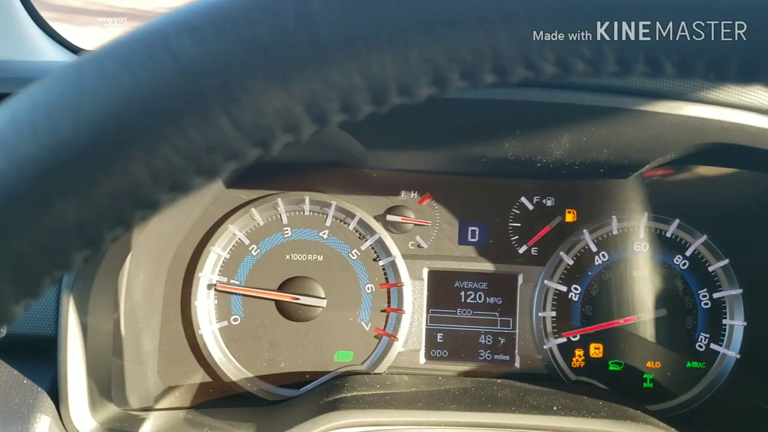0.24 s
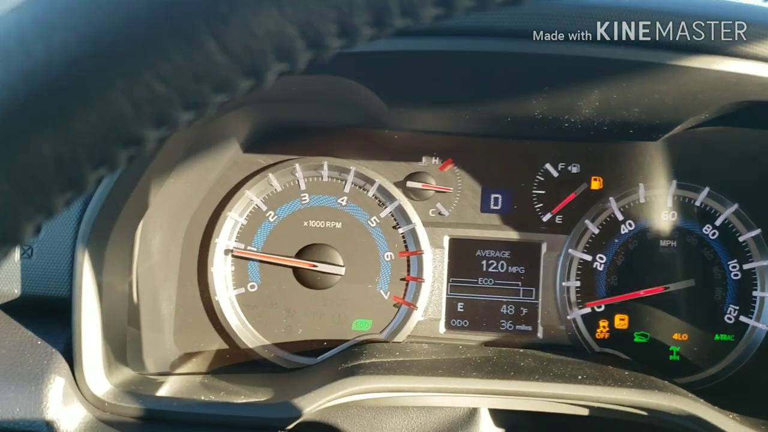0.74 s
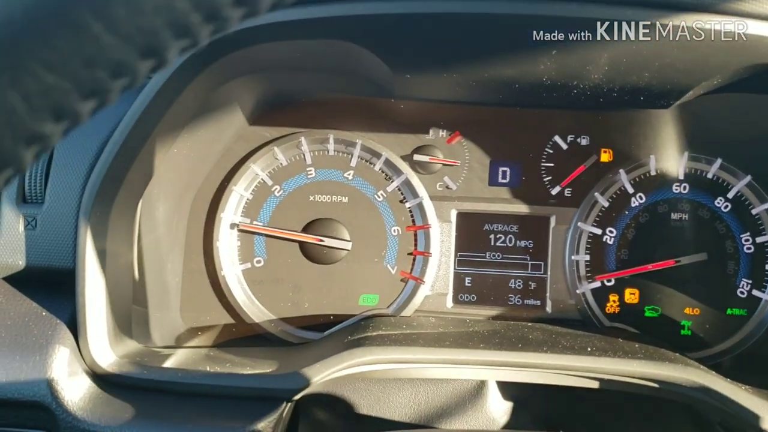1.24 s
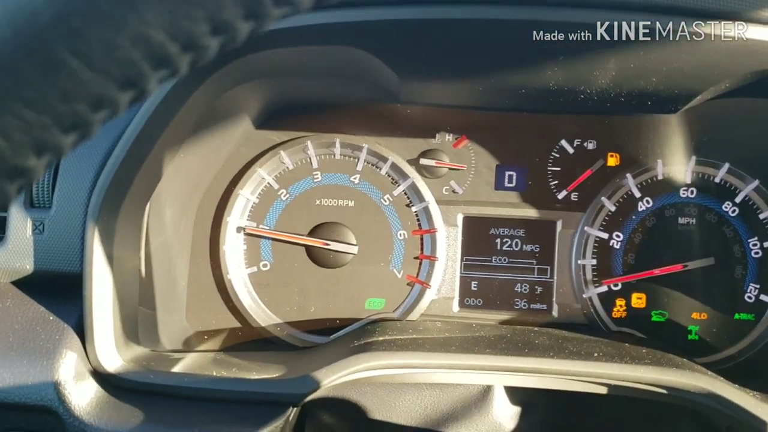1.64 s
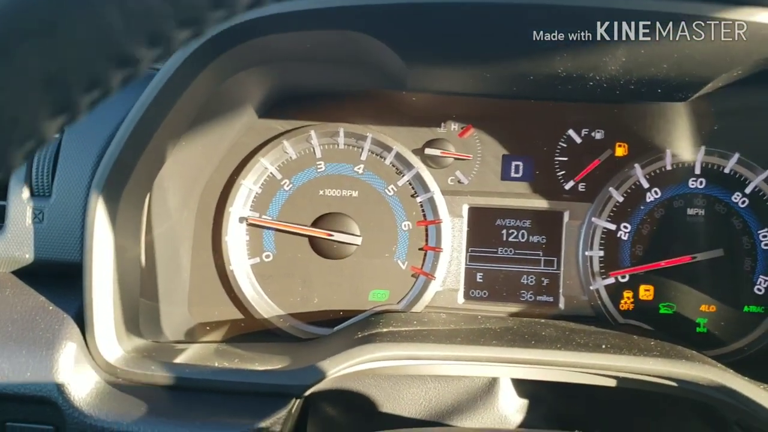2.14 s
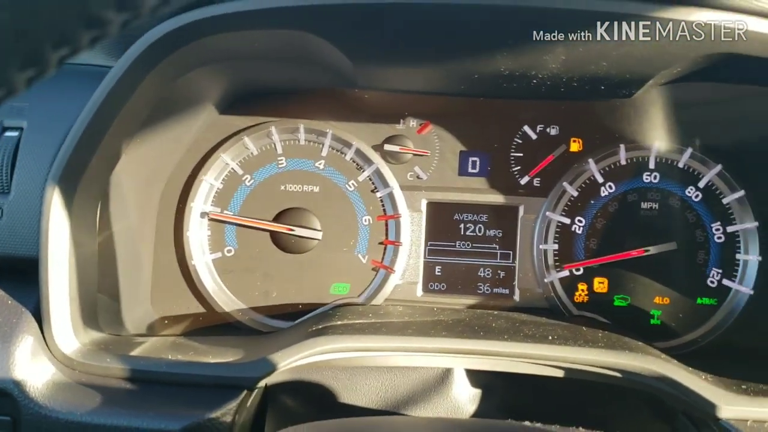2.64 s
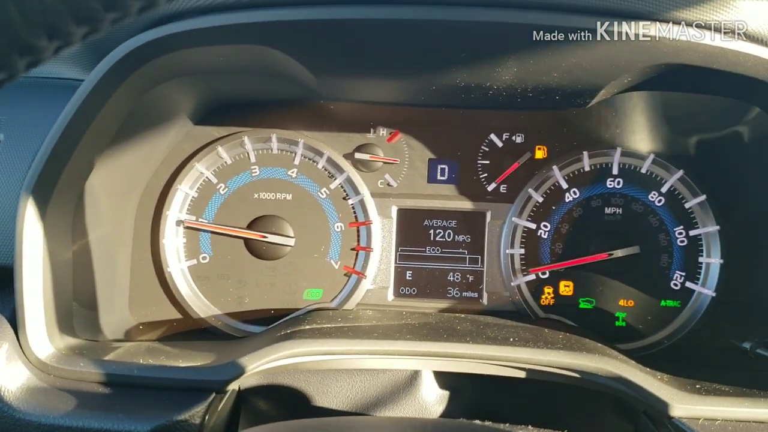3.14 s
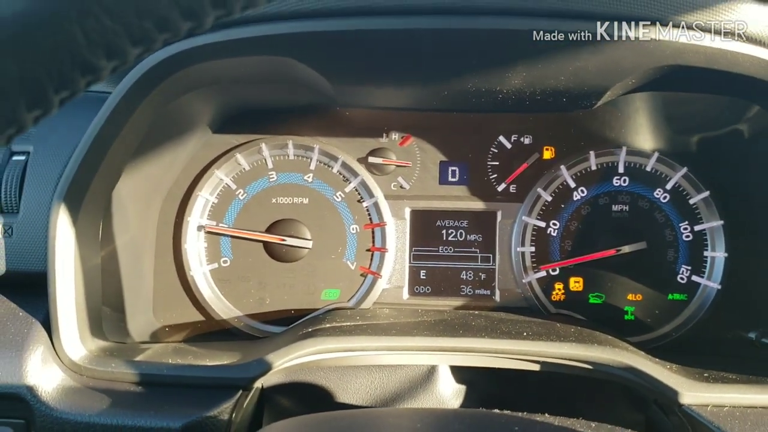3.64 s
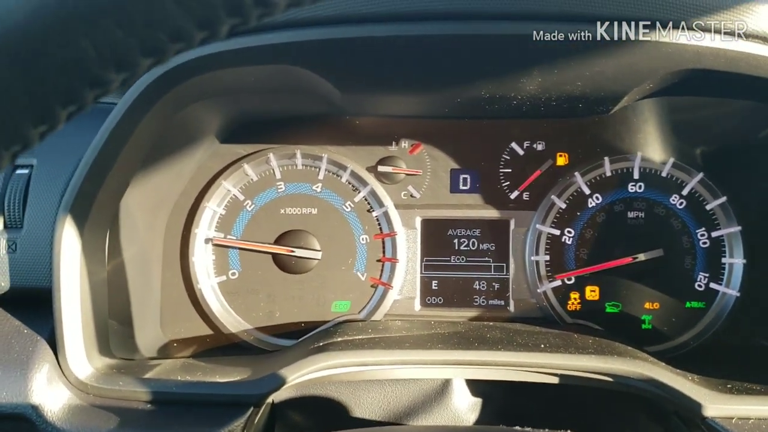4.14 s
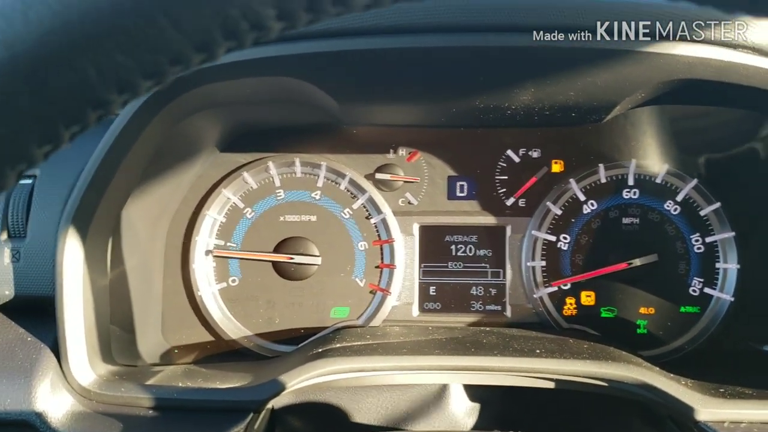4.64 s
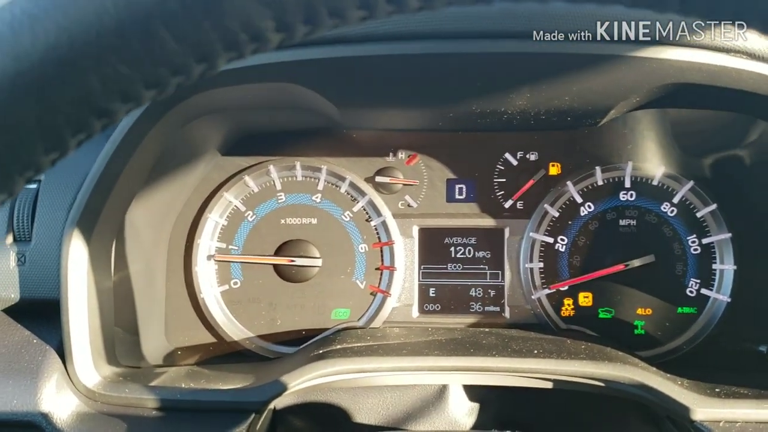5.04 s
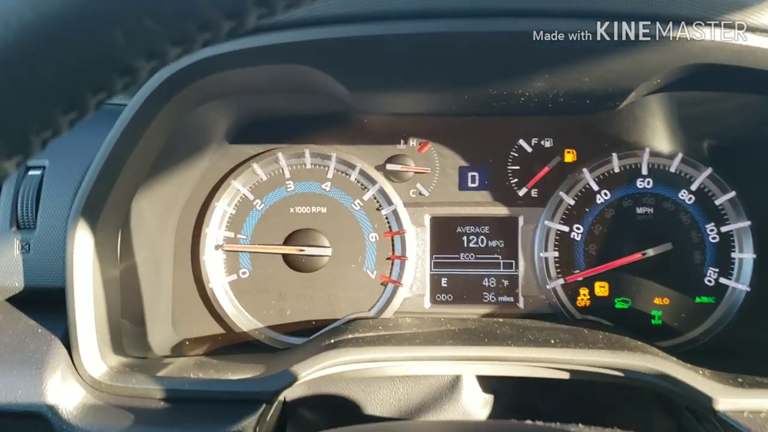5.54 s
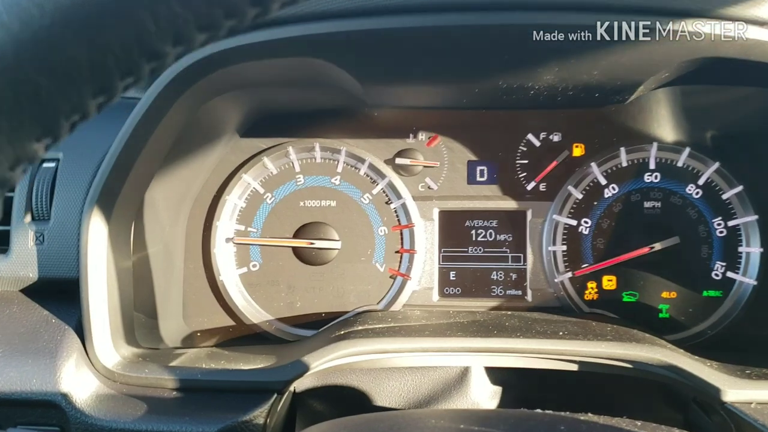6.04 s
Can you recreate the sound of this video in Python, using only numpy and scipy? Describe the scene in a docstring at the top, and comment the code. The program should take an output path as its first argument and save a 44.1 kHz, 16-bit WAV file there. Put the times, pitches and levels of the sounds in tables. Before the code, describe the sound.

Brake valves knock and clunk in irregular groups, heard from the cabin of a slowly moving vehicle and slightly to the left. Two quick metallic clunks open, then come scattered dull thuds, three firm hollow knocks and, after a pause, a heavy stuttering run of clunks that shakes the body. A low idling engine and tyre rumble continue underneath, the pitch dropping a little, with faint trim ticks and fluid hiss.

```python
"""An anti-lock brake unit works the brakes, heard inside an off-road vehicle that crawls at idle.
Its valves knock through the bulkhead (the wall behind the engine) and send pressure surges down the lines.
The brakes grab with metal clunks that thud through the body, and fluid hisses and sings in the valves.
Behind them, plastic trim ticks, the tyres rumble and a six-cylinder engine hums low."""
import sys
import numpy as np
from scipy import signal
from scipy.fft import rfft, irfft, next_fast_len
from scipy.io import wavfile

SR = 44100
rng = np.random.default_rng(int(sys.argv[2]) if len(sys.argv) > 2 else 0)


def master(y):
    """Save y as 16-bit WAV."""
    cut = np.clip(np.atleast_2d(y).T, -1, 1)
    pcm = np.round(cut * 32767)  # scale
    wavfile.write(sys.argv[1], SR, pcm.astype(np.int16))


N = 277389
TIME = np.arange(N) / SR
FFT_SIZE = next_fast_len(N + SR // 2, real=True)
FREQ = np.maximum(np.arange(FFT_SIZE // 2 + 1) * SR / FFT_SIZE, 1)

# how the engine idles: (time [s], firing rate [Hz], boost of harmonics 3 and up [dB])
IDLE = [(0, 45.1, 6.5), (.8, 45.44, 1), (1.5, 45.96, 2.5), (2.8, 45.51, 1.5), (3.799, 46.21, 2.5),
        (4.149, 44.22, -0.5), (4.449, 39.55, 1), (4.801, 37.38, -11), (5.3, 36.46, 0.5), (6.29, 36.7, -22)]
# the tones in its hum: (multiple of the firing rate, level [dB])
HARMONICS = [(1, -47.5), (2, -50.5), (3, -57), (4, -61), (5, -61), (6, -58), (7, -60.5), (8, -58), (9, -69),
             (10, -70.5), (12, -69), (13, -71)]
# the tone of its roar in the cabin: (frequency [Hz], relative level [dB])
ROAR_TONE = [(12, -26), (21, -4.5), (27, 9.5), (34, 3.5), (60, -17), (110, -12), (160, -7.5), (200, -29.5),
             (330, -15), (410, -19), (500, -24.5), (700, -27), (1000, -34), (2200, -52.5), (4600, -58.5),
             (8000, -57.5), (15500, -52.5)]
# how much the ears differ, against what they share: (frequency [Hz], level [dB])
STEREO_WIDTH = [(30, -18), (70, -40), (150, -11.5), (350, -3), (600, -8.5), (1100, 2.5), (2500, 0.5),
                (15000, -0.5)]
# how much louder the left ear hears the brakes: (frequency [Hz], left minus right [dB])
LEFT_BOOST = [(60, 1.5), (200, 3), (380, 3), (650, 1), (1200, 5), (2300, 12.5), (4400, 8.5), (7500, 8),
              (10000, 3), (14000, -4)]
# the clearest ticks of the trim: (time [s], level [dB], middle of the noise band [Hz])
TICKS = [(0.219, -55, 2800), (0.282, -62, 6400), (.299, -54.5, 4030), (0.339, -52, 2970),
         (0.393, -50, 3400), (.438, -55.5, 4390), (0.546, -48, 5500), (0.599, -53, 3800),
         (5.478, -54.5, 7500), (6.279, -58, 5100)]
# fluid gushes: (time [s], level [dB], opening [s], held open [s], jet relative to the gush [dB])
GUSHES = [(.12, -66, .18, .13, -18), (.55, -67.5, 0.017, 0.027, -12), (1.56, -62.5, 0.21, 0.23, -30),
          (2.48, -61.5, 0.048, 0.08, -8.5), (3.17, -71, 0.059, 0.019, -2), (5.34, -74, 0.077, 0.46, -20),
          (6.06, -67.5, 0.25, .1, -9)]
# spurts as the pressure is let off: (time [s], level [dB])
SPURTS = [(3.187, -61), (3.245, -59), (3.295, -67)]
# the whistle drifts slowly up and down, by each pitch's distance from their mean: (time [s], pitch [Hz])
WHISTLE_GLIDES = [
    [(0.7, 6600), (1.5, 6665)],
    [(2.74, 6530), (3.14, 6580)],
]
# a brake grabs or lets go and jolts the body: (time [s], level [dB], push length [s], cabin boom [dB])
JOLTS = [(3.544, -14, 0.017, -60), (5.294, -12, 0.025, -38), (5.323, -6.5, 0.0117, -27.5),
         (5.353, -5.5, 0.014, -44), (5.638, -13, 0.0068, -52), (5.728, -10, 0.0075, -34.5),
         (5.749, -5, 0.011, -57)]
# the brakes grab: (time [s], bulkhead [dB], bracket [dB], steel lines [dB], time to fade 60 dB [s])
CLUNKS = [(0.066, -28, -32.5, -35, 0.093), (0.111, -39, -45, -68, 0.11), (3.371, -27.5, -29.5, -38.5, 0.12),
          (5.267, -26, -34.5, -36.5, 0.1), (5.350, -24.5, -28, -37.5, 0.11), (5.58, -25, -31, -32.5, 0.087),
          (5.686, -25.5, -40.5, -42, 0.11), (5.749, -25.5, -25.5, -35.5, 0.083)]
# valve strokes: (time [s], knock [dB], surge [dB], thud pitch [Hz], opening scrape [dB], closing clack [dB])
STROKES = [(0.077, -25.5, -28, 205.5, -51, -48), (0.114, -26.5, -26, 196.5, -64, -55),
           (1.573, -32.5, -20.5, 160.4, -53, -47.5), (1.673, -36, -20, 152.6, -51.5, -45.5),
           (1.873, -38, -21, 177.3, -52, -44.5), (2.274, -32, -19.5, 170, -54.5, -55),
           (3.174, -18.5, -18, 128.5, -50.5, -70), (3.273, -17.5, -18, 123, -53.5, -80),
           (3.374, -18, -22, 138, -50.5, -61), (5.285, -20, -15, 149.2, -57, -63),
           (5.355, -18, -27, 164.3, -61, -60), (5.584, -51, -17, 129.2, -53.5, -61),
           (5.695, -24.5, -19.5, 155.7, -50.5, -51.5), (5.752, -19, -26, 136.5, -75, -69)]
# the pressure wave slaps the line after a stroke: (delay [s], level relative to the surge [dB])
SURGE_SLAPS = [(0.013, -4.5), (.025, -5), (0.044, 0.5), (0.057, -11.5), (0.076, -1.5)]

# the pitches each part favours, its resonances: (pitch [Hz], width [Hz], relative level [dB])
BODY_MODES = [(36.2, 7.6, 5.5), (58.4, 90, 6), (62.4, 3.9, -7), (78, 6.3, -9), (99, 34, 6),
              (142.5, 21, -2.5), (164, 78, -6), (196.3, 15, 2), (229, 49, -15.5)]
CABIN_MODES = [(153, 37, -5.5), (320.5, 11, -9.5), (357.1, 21, -2.5), (593.3, 52, -16), (1132, 32, -26.5),
               (1507, 53, -34.5), (1694, 114, -36)]
TRIM_MODES = [(1600, 1400, -2), (3240, 830, 1.5), (4830, 2000, -3.5), (6700, 730, -2.5),
              (11000, 21000, -16.5)]
OPENING_MODES = [(1670, 530, 12.5), (2370, 490, 5.5), (3240, 2400, 12), (5220, 1830, 4.5), (6200, 620, 11),
                 (11100, 11500, -1.5)]  # fluid rushing through a valve
JET_MODES = [(3400, 900, -46), (5970, 1600, 16), (6740, 880, 19.5), (8250, 2400, 10), (9900, 910, -3.5)]
WHISTLE_MODES = [(6260, 185, -8.5), (6560, 480, -5), (6860, 970, -7)]
SINGING_MODES = [(2760, 125, -6), (4190, 190, -5), (4590, 130, -9), (5640, 200, -5)]  # the thin singing of fluid trickling after the last clunk
BULKHEAD_MODES = [(179.8, 62, 0), (286, 62, -6.5), (374.7, 46, -1.5), (427, 10.7, -5.5), (521, 79, -11),
                  (574.8, 22, -4.5), (657, 100, -12), (800, 81, -28), (904, 45, -16.5), (1192, 210, -25)]
BRACKET_MODES = [(942, 460, 12), (1607, 144, 9.5), (1876, 230, 5), (2270, 1140, 0.5), (2946, 790, 3.5),
                 (3375, 145, 2), (3830, 350, -0.5), (4390, 380, -6.5)]
STEEL_MODES = [(3000, 1500, -7), (5600, 600, -3), (6280, 520, 1), (6850, 600, -2), (7400, 550, 0),
               (9000, 900, -3), (9900, 900, -2), (11400, 1600, -5), (13000, 1800, -6), (15000, 1800, -8)]
MOUNT_MODES = [(343, 44, 5), (366.4, 10.6, 5.5), (558, 85, -12), (594, 77, -20.5), (980, 150, -38)]  # the brake unit's mount

# tones that ring on after a blow: (pitch [Hz], level relative to the blow [dB], time to fade 60 dB [s])
BULKHEAD_RINGS = [(288, -14.5, 0.36), (412, -10, 0.31), (791, -15, 0.12)]
BRACKET_RINGS = [(1245, -22, 0.15), (1553, -17, 0.13), (1742, -18.5, 0.092), (2333, -17, 0.092),
                 (2918, -15, 0.07), (3430, -17, 0.079)]
STEEL_RINGS = [(5780, -14, .055), (6220, -7.5, 0.076), (7420, -14, .06)]
SEAT_RINGS = [(543, 5, 0.16), (936, -3.5, 0.09), (1306, -10, 0.17), (2600, -8.5, 0.11), (3200, -3.5, 0.05),
              (3603, 1, 0.074), (5100, -12.5, 0.074), (6090, -13, 0.055), (7260, -9.5, 0.081)]  # the clack of a plunger landing on its seat
PANEL_RINGS = [(59.67, -18.5, 1.97)]
FLOOR_RINGS = [(57.3, -13.5, 0.31)]
CABIN_RINGS = [(194.6, 0.0055, 1.47)]

# added to a plunger's scrape or clack in each part: (bulkhead [dB], bracket [dB], steel lines [dB])
SCRAPE_SPREAD = (20.5, 0.5, -8)
CLACK_SPREAD = (7.5, -2, -15.5)

CLACK_DELAY_S, THUD_DELAY_S = 0.017, 0.026  # counted from the start of a stroke
CHATTER_RISE_S = 0.005


def gain(db):
    """Turn decibels into a number to multiply by."""
    return 10 ** (np.asarray(db) / 20)


def decay(t, t60):
    """Stay at 1 until t is zero, then fade by 60 dB every t60 seconds."""
    return np.exp(-np.log(1000) * np.maximum(t, 0) / t60)


def swell(start, rise_s, hold_s, t60):
    """A loudness curve that opens, holds and dies away."""
    t = TIME - start
    return np.clip(t / rise_s, 0, 1) ** 2 * decay(t - rise_s - hold_s, t60)


def burst(rise_s, t60, tail_db, tail_t60):
    """The loudness curve of a hit: it builds, dies away and leaves a softer tail in the cabin."""
    t = TIME[:int(SR * min(max(t60, tail_t60), 1.5))]
    tail = gain(tail_db) * decay(t - rise_s, tail_t60)
    return np.minimum(t / rise_s, 1) ** 2 * (decay(t - rise_s, t60) + tail)


def push(length_s):
    """A smooth push that adds up to 1: the longer, the duller."""
    force = np.sin(np.pi * np.minimum(TIME[:SR // 10] / length_s, 1)) ** 2
    return force / force.sum()


def wander(step_samples=SR // 10):
    """A random curve that heads for a new value at every step."""
    knots = TIME[::step_samples]
    return np.interp(TIME, knots, rng.standard_normal(len(knots)))


def tone_curve(points):
    """A gain for every frequency, drawn through (Hz, dB) points."""
    hz, db = np.transpose(points)
    return gain(np.interp(np.log(FREQ), np.log(hz), db))


def resonances(modes):
    """A filter that favours a part's own pitches and keeps white noise equally strong."""
    power = sum((gain(db) / (1 + ((FREQ - hz * hz / FREQ) / width) ** 2)) ** 2 for hz, width, db in modes)
    # keeping half the cepstrum makes the part ring after a hit, never before it
    cepstrum = irfft(np.log(power / power.mean() + 1e-9))
    return np.exp(rfft(np.r_[cepstrum[0] / 2, cepstrum[1:FFT_SIZE // 2]], FFT_SIZE))


def filtered(sound, response):
    """Turn each frequency of a sound up or down."""
    return irfft(rfft(sound, FFT_SIZE) * response, FFT_SIZE)[..., :N]


def stereo_noise():
    """Noise whose bass is alike in both ears and whose treble is not."""
    width = tone_curve(STEREO_WIDTH)
    shares = np.array([np.ones_like(width), width]) / np.sqrt(1 + width ** 2)
    mid, side = filtered(rng.standard_normal((2, N)), shares)
    return np.array([mid + side, mid - side])


def add(track, start, sound):
    """Mix a sound into a track at a start time in seconds."""
    first = max(int(start * SR), 0)
    part = sound[:max(N - first, 0)]
    track[first:first + len(part)] += part


def strike(force, modes):
    """Shake a part with a force; one sharp tap of size 1 gives a peak of 1."""
    response = resonances(modes)
    return filtered(force, response / np.abs(irfft(response)).max())


def ring(blows, tones):
    """A part rings on after its blows (time, level); rattling joints make the high tones waver."""
    out = np.zeros((2, N))
    ear_lags_s = (0, 0.00005)  # the right ear is a little further away
    for hz, tone_db, t60 in tones:
        envelope = gain(tone_db) * burst(0.0037, t60, tail_db=-46, tail_t60=0.23)
        t = TIME[:len(envelope)]
        drift_s = np.cumsum(0.16 * rng.standard_normal((2, 2 * SR)), axis=1) / SR
        for start, db in blows:
            strength = gain(db + rng.standard_normal())  # no two blows land quite alike
            wavers = drift_s[:, rng.integers(SR // 2):]
            for ear, waver_s, lag_s in zip(out, wavers, ear_lags_s):
                wavering_time = t + waver_s[:len(t)] - waver_s[0] - lag_s
                add(ear, start, strength * envelope * np.sin(2 * np.pi * hz * wavering_time))
    return out


def body_rumble(tyre_db=-45.5, shudder_db=-17.5):
    """The body rumbles on the rolling tyres and shudders on after every pressure surge."""
    shudder_power = sum((gain(surge_db + shudder_db) * swell(start, 0.097, hold_s=0, t60=2.54)) ** 2
                        for start, _, surge_db, *_ in STROKES)
    loudness = np.sqrt(gain(tyre_db) ** 2 + shudder_power)
    return filtered(stereo_noise() * loudness, resonances(BODY_MODES))


def engine(roar_db=-43, cabin_db=-51.5):
    """Slightly uneven firing makes a hum, over a dull, throbbing roar that rings the cabin."""
    times, firing_hz, boost_db = np.transpose(IDLE)
    phase = 2 * np.pi * np.cumsum(np.interp(TIME, times, firing_hz) * (1 + 0.003 * wander())) / SR
    boost = gain(np.interp(TIME, times, boost_db))
    hum = np.zeros(N)
    for multiple, db in HARMONICS:
        level = gain(db + 2.23 * wander()) * (boost if multiple >= 3 else 1)
        hum += level * np.sqrt(2) * np.sin(multiple * phase + rng.uniform(0, 2 * np.pi))
    roar_tone = tone_curve(ROAR_TONE)
    roar_tone /= np.sqrt(np.mean(roar_tone ** 2))
    throb = 1 + 0.1 * np.sin(phase)
    roar = gain(roar_db) * filtered(stereo_noise() * throb, roar_tone)
    shaking = stereo_noise() * throb * gain(3.04 * wander())
    return hum + roar + gain(cabin_db) * filtered(shaking, resonances(CABIN_MODES))


def trim_ticks():
    """The plastic trim ticks drily, and rattles faintly as it settles after the first clunk."""
    out = np.zeros((2, N))
    rattle = [(0.15 + 0.21 * when, -63 + 6 * (size - 0.5), 3740 * 2 ** (tone - 0.5))
              for when, size, tone in rng.random(size=(10, 3))]
    for start, db, hz in TICKS + rattle:
        envelope = gain(db) * burst(0.00056, t60=0.025, tail_db=-14.5, tail_t60=0.18)
        band = signal.butter(1, [hz / 2, min(hz * 2, 0.45 * SR)], "band", fs=SR)
        for ear in out:
            add(ear, start, signal.lfilter(*band, envelope * rng.standard_normal(len(envelope))))
    return filtered(out, resonances(TRIM_MODES))


def valve_whistle(pressure, level_db=-78):
    """Held pressure whistles through a nearly shut valve; the pitch drifts slowly up and down."""
    whistle = filtered(stereo_noise() * gain(level_db) * pressure, resonances(WHISTLE_MODES))
    times, hz = np.vstack(WHISTLE_GLIDES).T
    shift_hz = np.interp(TIME, times, hz) - hz.mean()
    glide = np.exp(2j * np.pi * np.cumsum(shift_hz) / SR)
    return np.real(signal.hilbert(whistle, FFT_SIZE)[:, :N] * glide)


def brake_fluid(leak_db=-80, seep_db=-83, singing_db=-74.5):
    """Fluid rushes through the valves, jets out on release and sings after the last clunk."""
    pressure = decay(TIME - 3.1, t60=3.8)  # held until 3.1 s, then let off
    gushes = np.zeros(N)
    jets = sum(gain(db) * swell(start, 0.013, hold_s=0.011, t60=0.21) for start, db in SPURTS)
    for start, db, rise_s, hold_s, jet_db in GUSHES:
        gush = gain(db) * swell(start, rise_s, hold_s, t60=0.38)
        gushes += gush
        jets += gain(jet_db) * gush
    flow = np.sqrt(gushes ** 2 + (gain(leak_db) * pressure) ** 2 + gain(seep_db) ** 2)
    trickle = gain(singing_db) * np.clip((TIME - 5.72) / 0.24, 0, 1)
    swirl = stereo_noise() * gain(wander(step_samples=300))
    rush = filtered(swirl * flow, resonances(OPENING_MODES))
    hiss = filtered(stereo_noise() * jets, resonances(JET_MODES))
    singing = filtered(swirl * trickle, resonances(SINGING_MODES))
    return rush + hiss + singing + valve_whistle(pressure)


def ringing_parts(thud_db=-8.5, thud_t60=0.39):
    """Clunks ring the metal, plungers their seats, surges the lines and panels, jolts floor and cabin."""
    out = np.zeros((2, N))
    mid_rise_s = CHATTER_RISE_S / 2
    for part, tones in enumerate((BULKHEAD_RINGS, BRACKET_RINGS, STEEL_RINGS)):
        out += ring([(start + mid_rise_s, levels[part]) for start, *levels in CLUNKS], tones)
    out += ring([(start + CLACK_DELAY_S + mid_rise_s, db) for start, *_, db in STROKES], SEAT_RINGS)
    for start, _, surge_db, hz, *_ in STROKES:
        out += ring([(start + THUD_DELAY_S, surge_db)], [(hz, thud_db, thud_t60)])
    out += ring([(start + THUD_DELAY_S, surge_db) for start, _, surge_db, *_ in STROKES], PANEL_RINGS)
    out -= ring([(start + 0.35 * length_s, db) for start, db, length_s, _ in JOLTS], FLOOR_RINGS)
    return out + ring([(start, boom_db) for start, *_, boom_db in JOLTS], CABIN_RINGS)


def metal_clunks(scrape_t60=0.42, clack_t60=0.13):
    """Metal chatters on metal as the brakes grab and as each valve's plunger lifts and shuts."""
    scrapes = [(start, *(db + np.array(SCRAPE_SPREAD)), scrape_t60) for start, *_, db, _ in STROKES]
    clacks = [(start + CLACK_DELAY_S, *(db + np.array(CLACK_SPREAD)), clack_t60)
              for start, *_, db in STROKES]
    bulkhead, bracket, steel = np.zeros((3, N))
    for start, bulkhead_db, bracket_db, steel_db, t60 in CLUNKS + scrapes + clacks:
        add(bulkhead, start, gain(bulkhead_db) * burst(CHATTER_RISE_S, t60, tail_db=-3.5, tail_t60=0.28))
        add(bracket, start, gain(bracket_db) * burst(CHATTER_RISE_S, t60, tail_db=-26.5, tail_t60=0.29))
        add(steel, start, gain(steel_db) * burst(CHATTER_RISE_S, t60, tail_db=-20.5, tail_t60=0.22))
    # the chatter is a run of tiny hits of uneven size
    hit_sizes = gain(2 * np.repeat(rng.standard_normal(N // 32 + 1), 32)[:N])
    chatter = 0.5 * stereo_noise() * hit_sizes / np.sqrt(np.mean(hit_sizes ** 2))
    parts = (bulkhead, BULKHEAD_MODES), (bracket, BRACKET_MODES), (steel, STEEL_MODES)
    return sum(filtered(chatter * force, resonances(modes)) for force, modes in parts)


def valve_knocks():
    """Each stroke knocks hollowly on the mount; its surges and the grabbing brakes shake the body."""
    knocks, shoves = np.zeros((2, N))
    for start, knock_db, surge_db, *_ in STROKES:
        add(knocks, start, gain(knock_db) * push(0.00092))
        add(knocks, start + 0.00669, 0.16 * gain(knock_db) * push(0.00091))  # the plunger bounces once
        for delay_s, slap_db in SURGE_SLAPS:
            add(shoves, start + delay_s, gain(surge_db + slap_db) * push(0.0038))
    for start, db, length_s, _ in JOLTS:
        add(shoves, start, -gain(db) * push(length_s))
    return strike(knocks, MOUNT_MODES) + strike(shoves, BODY_MODES)


def scene():
    """The brake unit, the trim and the tyre rumble sit ahead to the left; the engine fills the cabin."""
    brakes = valve_knocks() + metal_clunks() + ringing_parts() + brake_fluid()
    left_gain = np.sqrt(tone_curve(LEFT_BOOST))
    from_left = filtered(brakes + trim_ticks() + body_rumble(), np.array([left_gain, 1 / left_gain]))
    return from_left + engine() * gain([[0.6], [-0.6]])


def record(dry):
    """Drop the deepest bass and the highest treble."""
    dry = signal.sosfilt(signal.butter(2, 18, "high", fs=SR, output="sos"), dry)
    return signal.sosfilt(signal.ellip(10, 0.2, 70, 15800, fs=SR, output="sos"), dry)


dry = scene()
out = record(dry)
master(out)
```